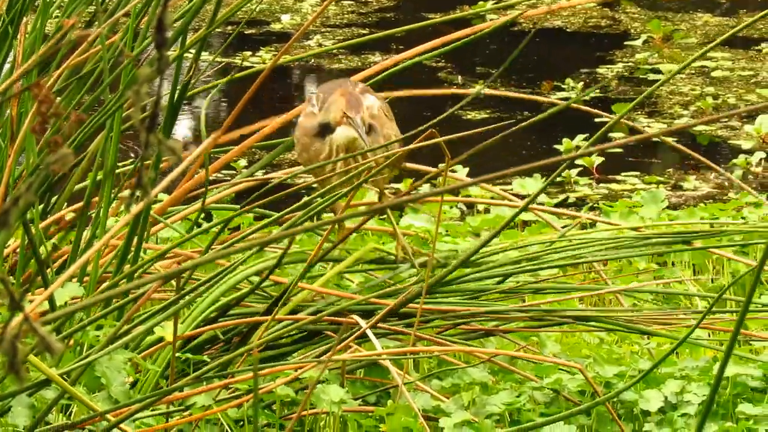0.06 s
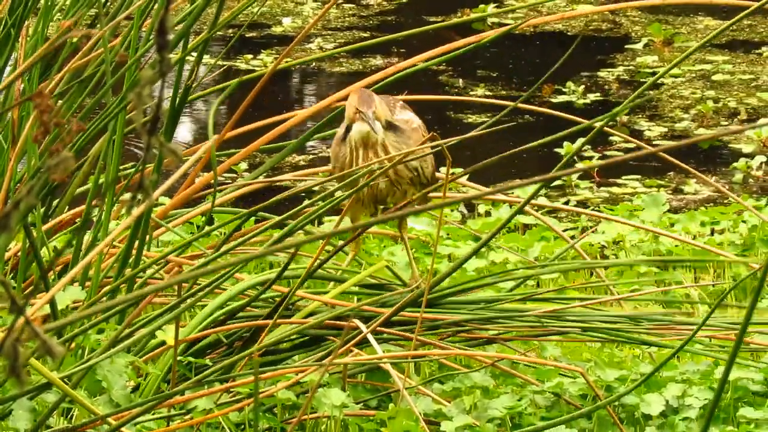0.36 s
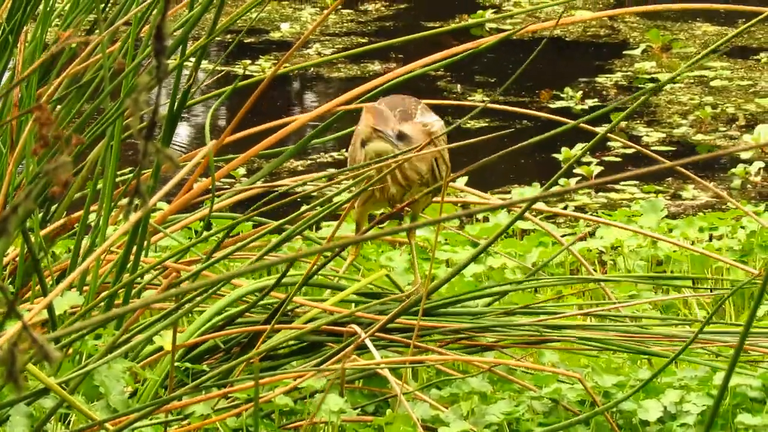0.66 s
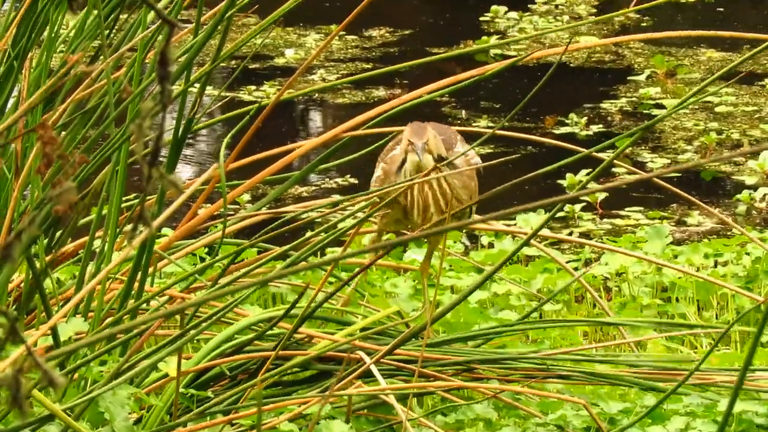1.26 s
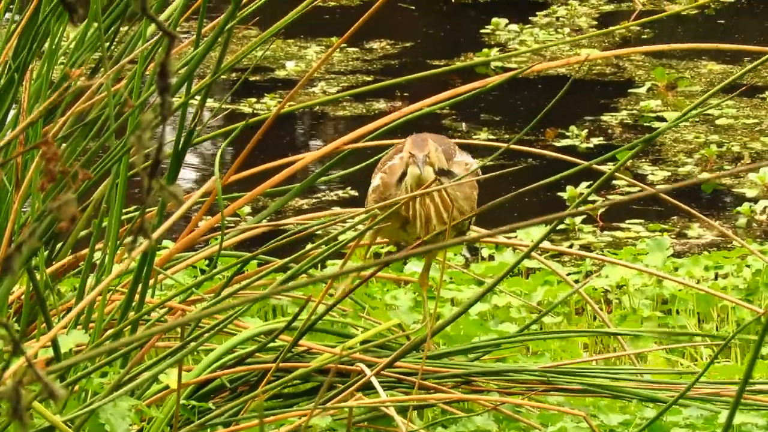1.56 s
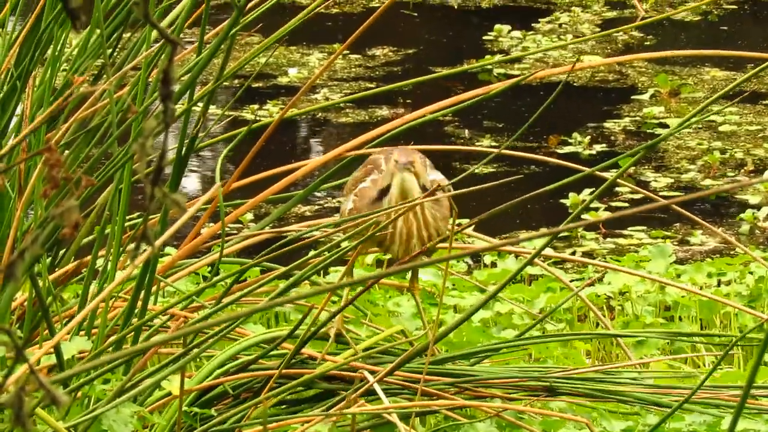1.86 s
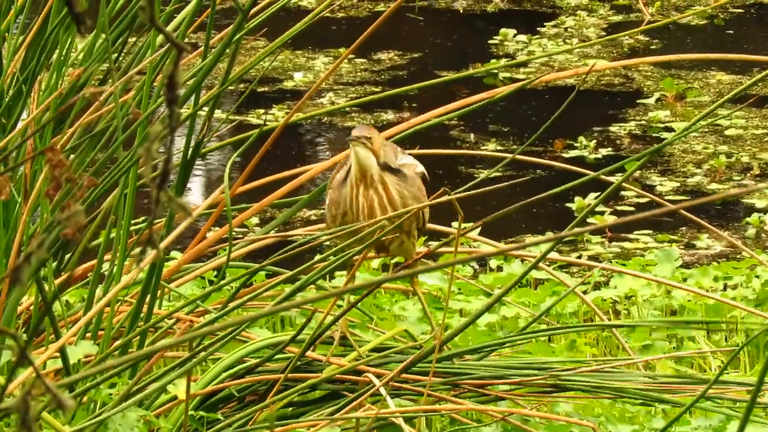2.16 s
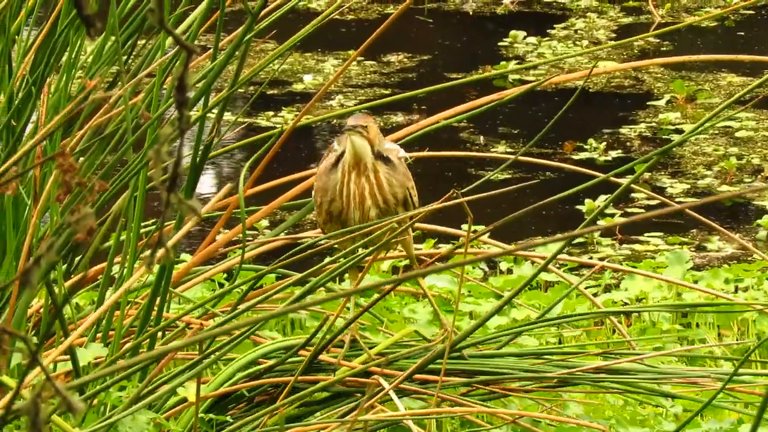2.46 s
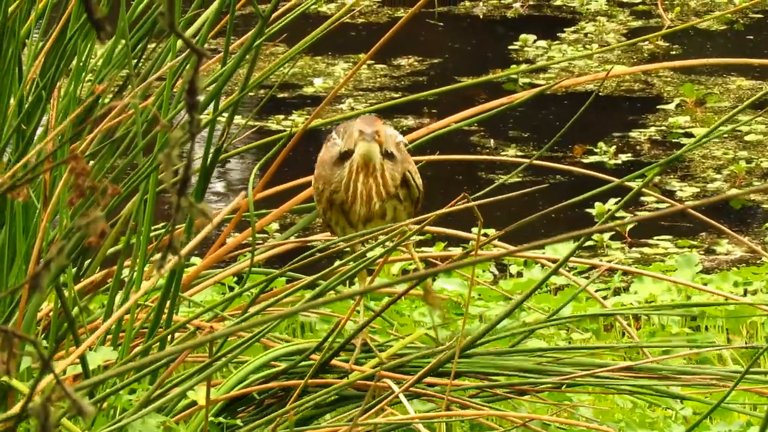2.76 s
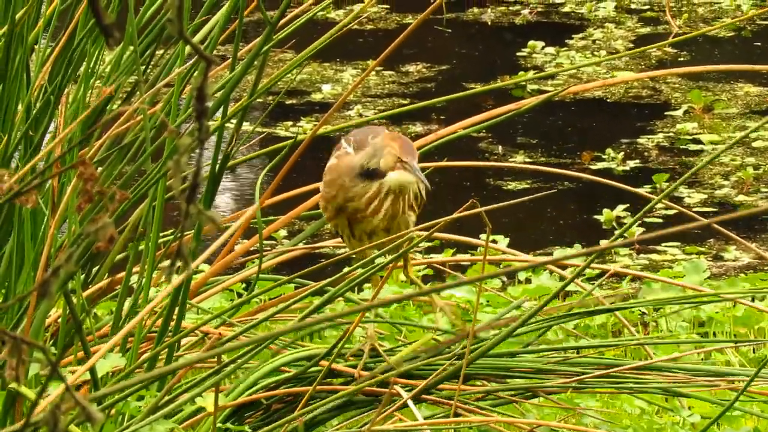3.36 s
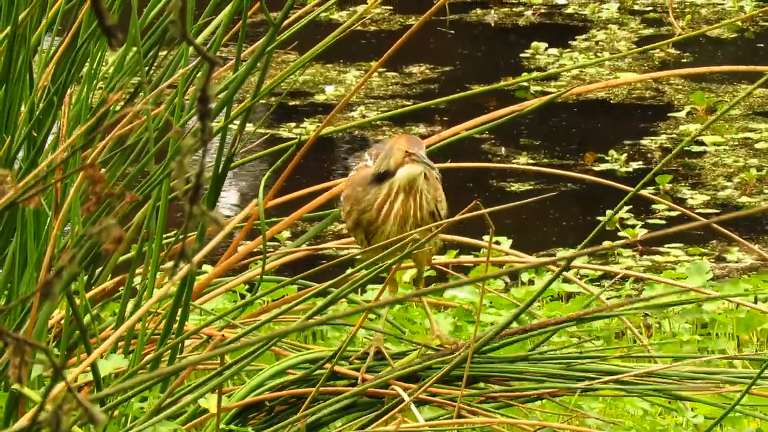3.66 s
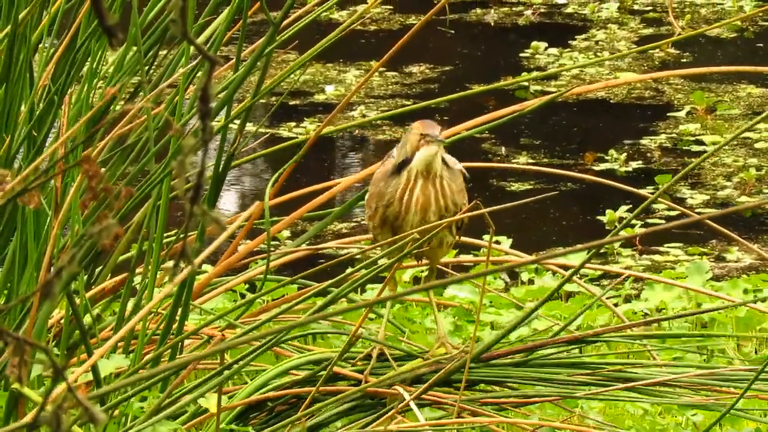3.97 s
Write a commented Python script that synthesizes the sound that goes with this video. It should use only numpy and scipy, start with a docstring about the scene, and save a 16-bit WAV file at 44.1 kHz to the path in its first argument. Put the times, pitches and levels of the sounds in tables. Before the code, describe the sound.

Wind thumps on the microphone in low pulses at the start, around 2 seconds and most strongly from 2.8 seconds on, over a steady distant rumble. Two faint hoarse squeaks come at 0.6 seconds. Distant birds pipe twice and slur a whistle between 0.9 and 1.5 seconds, then chirp thinly from 2.5. A water bird yelps softly four times after 3.1, and a bird rasps at the end.

```python
"""Breezy marsh with songbirds

Two microphone ports in the open by a pond. Eddies of wind thump right across them in low gulping
pulses, mostly left first. Off in the echoing trees, songbirds pipe, slur and rasp; a dry reed ticks,
something squeaks twice and a water bird yelps. Far behind lies a steady rumble like traffic."""
import sys
import numpy as np
from scipy import signal
from scipy.fft import rfft, irfft
from scipy.io import wavfile
from scipy.ndimage import uniform_filter1d

SR = 44100
rng = np.random.default_rng(int(sys.argv[2]) if len(sys.argv) > 2 else 0)


def store_pcm(level_fs):
    """Save levels as 16-bit WAV."""
    pcm = np.round(np.clip(level_fs, -1, 1) * 32767).astype(np.int16)
    wavfile.write(sys.argv[1], SR, np.atleast_2d(pcm).T)


N = 176400

# Levels in the tables are relative, ahead of the mix gains and the echo.
# far rumble and leaf hiss, spectrum of the mid channel: f/Hz, level/dB
RUMBLE_SPECTRUM = [(25, -19), (60, -2.5), (230, 3.5), (320, -6), (480, -6.5), (590, -8), (690, -6.5),
                   (745, -2), (790, -5.5), (850, -2), (885, -12), (935, -1), (1010, -10.5), (1062, -1.5),
                   (1125, -13), (1200, -12), (2000, -22.5), (3700, -25.5), (5200, -32.5), (8000, -39),
                   (14000, -48.5)]
# its stereo width, side relative to mid: f/Hz, level/dB
RUMBLE_WIDTH = [(200, -27), (400, -1.5), (900, -14), (1300, -4.5), (2300, -0.5), (4200, -2.5), (7700, 2),
                (14000, 0.5)]
# large eddies at the microphone: t/s, level/dB, centre f/Hz, lag of the right port/ms
LARGE_EDDIES = [(.006, -23, 128, 5), (0.051, -27, 119, 2), (.134, -25.5, 141, 2.5),
                (0.197, -20.5, 136, 3.5), (.282, -23.5, 178, 0.5), (.545, -30, 134, 0.75),
                (.862, -35, 130, 1.1), (1.352, -23.5, 163, 2), (1.741, -23, 100, 1.4),
                (1.853, -22.5, 112, 3.5), (1.914, -22.5, 118, 4), (2.039, -20, 145, 4),
                (2.098, -25.5, 134, 2.5), (2.139, -23.5, 143, 2.5), (2.196, -18, 143, 2.5),
                (2.310, -32, 178, -0.5), (2.806, -31, 125, 0.3), (2.850, -24.5, 177, 0.25),
                (2.864, -21.5, 248, 0.55), (3.029, -22.5, 225, .5), (3.065, -24, 212, 0.4),
                (3.180, -23.5, 166, 0.05), (3.199, -22.5, 260, 0.9), (3.206, -19.5, 310, 1.6),
                (3.229, -25.5, 128, 0.5), (3.314, -20, 221, 3), (3.328, -23, 138, -1.5),
                (3.386, -17.5, 188, 1.84), (3.522, -17, 176, 1.9), (3.544, -23.5, 172, 0.65),
                (3.698, -16, 197, 2.16), (3.730, -25, 173, 0.8), (3.758, -25.5, 157, 1.0)]
# strength of the breeze's small eddies: t/s, level/dB
BREEZE_LEVEL = [(0, -34.5), (.14, -33.5), (.24, -46.5), (.38, -56.5), (.46, -44.5), (.63, -42.5),
                (.76, -57), (.86, -45), (1.0, -62.5), (1.3, -59.5), (1.481, -47), (1.8, -43), (1.92, -36.5),
                (2.191, -32), (2.24, -53.5), (2.65, -73), (2.83, -35.5), (2.93, -48), (3.05, -36.5),
                (3.13, -45), (3.2, -34), (3.46, -39), (3.56, -33.5), (3.63, -42), (3.76, -35),
                (3.88, -41.5), (4, -53)]
# thin glides of distant birds: t/s, length/s, start f/Hz, end f/Hz, level/dB
FAR_NOTES = [(0.048, 0.03, 7350, 5800, -60), (2.453, .06, 6750, 6550, -66),
             (2.538, 0.06, 6900, 6500, -65.5), (2.645, 0.087, 4520, 4665, -63),
             (2.682, 0.052, 6150, 6230, -64), (2.737, 0.056, 4620, 4680, -56.5),
             (2.831, 0.028, 4750, 4640, -60), (2.946, 0.047, 6340, 5860, -60.5),
             (3.05, 0.072, 6160, 5780, -59.5), (3.183, 0.051, 5780, 5500, -66.5)]
# song so far off that only a haze arrives: t/s, length/s, centre f/Hz, width/Hz, level/dB
SONG_HAZES = [(.82, 0.46, 4520, 750, -71), (1.61, 0.16, 3700, 700, -66), (2.73, 0.14, 3900, 1100, -68.5)]
# reed tick: t/s, centre f/Hz, width/Hz, level/dB
REED_TICKS = [(0.109, 3320, 900, -49.5)]
# hoarse squeaks: t/s, length/s, start f/Hz, end f/Hz, tone level/dB, hiss level/dB
SQUEAK_NOTES = [(0.554, 0.0555, 1120, 1230, -60, -62.5), (0.624, .08, 1102, 1323, -61, -70)]
# their overtones: multiple of f, level/dB
SQUEAK_PARTIALS = [(2, -3), (3, -0.5), (4, -18)]
# piping notes in the trees: t/s, length/s, level/dB
PIPE_NOTES = [(0.891, 0.095, -48), (1.302, 0.15, -49)]
# one long slurred whistle: t/s, f/Hz, level/dB
SLUR_CONTOUR = [(1.268, 3290, -61), (1.288, 4110, -54), (1.32, 4405, -53), (1.355, 4416, -48.5),
                (1.41, 4260, -52.5), (1.445, 4175, -58), (1.482, 4330, -48), (1.497, 5000, -52),
                (1.514, 5900, -55), (1.535, 6240, -58), (1.555, 6170, -74.5)]
# water bird's yelps: t/s, length/s, start f/Hz, end f/Hz, level/dB
YELP_NOTES = [(3.136, 0.073, 1101, 790, -50.5), (3.263, .085, 690, 830, -53.5),
              (3.698, 0.052, 860, 735, -46.5), (3.923, 0.056, 1130, 680, -46.5)]
# note that opens the rasp: t/s, length/s, f/Hz, level/dB
RASP_FIRST_NOTE = (3.852, .055, 4030, -58.5)
# rasping call: t/s, centre f/Hz, level/dB
RASP_CONTOUR = [(3.867, 5700, -70), (3.9, 5450, -57.5), (3.916, 4140, -52.5), (3.955, 3854, -50),
                (4.0, 3720, -48.5)]

EDGE_S, NOTE_SWELL_S = .022, .028  # rise and fall of a note: usual, softer
REEDS_T60_S, CALL_T60_S = .31, 1.5  # scatter from near reeds, echo of the short calls


def undb(db):
    return 10 ** (np.asarray(db) / 20)


def unit(x):
    return x / np.sqrt(np.mean(x ** 2))


def clock():
    return np.arange(N) / SR


def walk(rate):
    """Smooth random wander with spread near 1, about `rate` turns a second."""
    hold = max(int(SR / rate), 1)
    steps = rng.standard_normal(N)[np.arange(N) // hold]
    return 1.3 * uniform_filter1d(uniform_filter1d(steps, hold), hold)


def per_bin(points):
    """Gain at every frequency from rows of f/Hz, level/dB."""
    hz, db = np.array(points).T
    f = np.arange(N // 2 + 1) * SR / N
    return undb(np.interp(np.log(f + 1e-3), np.log(hz), db))


def noise(gain):
    return irfft(rfft(rng.standard_normal(N)) * gain, N)


def band(hz, width):
    """Noise of rms 1 in one band."""
    f = np.arange(N // 2 + 1) * SR / N
    return unit(noise(1 / (1 + (2 * (f - hz) / width) ** 4)))


def tone(hz):
    """Sine of rms 1 on a moving pitch."""
    return np.sqrt(2) * np.sin(2 * np.pi * np.cumsum(hz) / SR)


def contour(rows):
    """Pitch and gain of a call from rows of t/s, f/Hz, level/dB."""
    s, hz, db = np.array(rows).T
    return np.interp(clock(), s, hz), undb(np.interp(clock(), s, db, left=-np.inf, right=-np.inf))


def glide(start, length, hz0, hz1, db, edge_s=EDGE_S):
    """Pitch and gain of a note that swells, glides and fades."""
    t = clock() - start
    edge = np.clip(np.minimum(t, length - t) / min(edge_s, length / 2), 0, 1)
    return np.interp(t, [0, length], [hz0, hz1]), undb(db) * edge


def trees(call, wet, t60=CALL_T60_S, near=1):
    """A call at the microphone: direct sound, quick scatter off near reeds, a long fluttering echo."""
    t = clock()[:N // 2]
    decay = near * unit(undb(-60 * t / REEDS_T60_S)) + .88 * unit(undb(-60 * t / t60))
    paths = rng.standard_normal((2, 2, len(t))) * unit(decay) / np.sqrt(len(t))
    one, other = signal.fftconvolve(call[None, None], paths, axes=2)[..., :N]
    sway = 1.3 * walk(30)  # radians; drifting between two echoes makes the flutter
    mid, side = np.cos(sway) * one + np.sin(sway) * other
    width = .42
    echo = np.array([mid + width * side, mid - width * side])
    return (call + wet * echo) / np.hypot(1, wet)


def rumble(level_db=-47, waver_db=1.0):
    """Far traffic near the centre, with a wide, faint leaf hiss above it."""
    colour = per_bin(RUMBLE_SPECTRUM)
    mid, side = noise(colour), noise(colour * per_bin(RUMBLE_WIDTH))
    low = signal.sosfilt(signal.butter(2, 1500, fs=SR, output="sos"), mid)
    waver = low * (undb(waver_db * walk(8.29)) - 1)
    return undb(level_db) * np.array([mid + waver + side, mid + waver - side]) / np.std(mid)


def add_eddy(ports, s, gain, hz, lag_ms):
    """A pressure dip between two shoulders reaches the ports in turn, a little changed on the way."""
    span = np.arange(max(int(s * SR) - 1200, 0), min(int(s * SR) + 1200, N))
    for port, sign in enumerate((-1, 1)):
        delay_s = sign * lag_ms / 2000  # half the lag each way
        port_hz = hz * np.exp(.1 * rng.standard_normal())
        spread = (np.pi * port_hz * (span / SR - s - delay_s)) ** 2
        ports[port, span] += gain * (2 * spread - 1) * np.exp(-spread)


def wind(small_per_s=160, port_top_hz=462, left_minus_right_db=-1.5):
    """Wind on the microphone: large eddies amid small ones that follow their size and direction."""
    large, small = np.zeros((2, 2, N))
    for s, db, hz, lag_ms in LARGE_EDDIES:
        add_eddy(large, s, undb(db + 1.25), hz, lag_ms)
    times, _, centres, lags = np.array(LARGE_EDDIES).T
    usual_hz = uniform_filter1d(centres, size=5)
    count = int(small_per_s * N / SR)
    for k, (when, loud, pitch, way) in enumerate(rng.standard_normal((count, 4))):
        s = np.clip((k + when) / small_per_s, 0, N / SR)
        hz = np.interp(s, times, usual_hz) * .84 * 2 ** (.38 * np.clip(pitch, -2, 2))
        lag_ms = np.interp(s, times, lags) + .46 * way
        add_eddy(small, s, undb(2 * np.clip(loud, -2, 2)), hz, lag_ms)
    breeze = undb(np.interp(clock(), *np.array(BREEZE_LEVEL).T) + 1.5)
    pressure = large + unit(small) * breeze
    f = np.arange(N + 1) * SR / (2 * N)
    port_lowpass = 1 / np.hypot(1, (f / port_top_hz) ** 6)
    pan = undb(np.array([[1], [-1]]) * left_minus_right_db / 2)
    return irfft(rfft(pressure, 2 * N) * port_lowpass)[:, :N] * pan


def whistles(rows, edge_s):
    """Gliding sine notes with a slight waver in pitch."""
    waver = 1 + .008 * walk(400)
    return sum(gain * tone(hz * waver) for hz, gain in (glide(*row, edge_s) for row in rows))


def far_birds():
    """Thin distant notes and a haze of song from farther off, more echo than direct sound."""
    notes = whistles(FAR_NOTES, NOTE_SWELL_S)
    haze = sum(glide(s, length, hz, hz, db)[1] * band(hz, width)
               for s, length, hz, width, db in SONG_HAZES)
    return trees(notes + haze, wet=1.34)


def reed(decay_s=.0039):
    """A dry stem ticks once: a burst of noise, dead centre, with no echo."""
    t = clock()
    return sum(undb(db) * band(hz, width) * (t > s) * np.exp(-np.abs(t - s) / decay_s)
               for s, hz, width, db in REED_TICKS)


def squeaks():
    """Two hoarse squeaks, mostly direct sound: rough harmonics in a scratchy hiss."""
    rough = 1 + .035 * walk(700)
    hiss = band(hz=3900, width=5300)
    calls = 0
    for s, length, hz0, hz1, tone_db, hiss_db in SQUEAK_NOTES:
        hz, gain = glide(s, length, hz0, hz1, 0)
        voice = sum(undb(db) * tone(k * hz * rough) for k, db in SQUEAK_PARTIALS)
        calls = calls + gain * (undb(tone_db) * voice + undb(hiss_db) * hiss)
    return trees(calls, wet=.35)


def piper(hz=3091):
    """A bird pipes two pure notes on one pitch that ring on among the trees."""
    gain = sum(glide(s, length, hz, hz, db, NOTE_SWELL_S)[1] for s, length, db in PIPE_NOTES)
    waver = 1 + .003 * walk(79.66)
    return trees(gain * tone(hz * waver), wet=.56, t60=2.2, near=.25)


def slur(flick_s=1.487, t60=.96):
    """A whistle rises and quivers; its hoarse upward flick reaches the microphone mostly as echo."""
    hz, gain = contour(SLUR_CONTOUR)
    flick = np.clip((clock() - flick_s) / EDGE_S + .5, 0, 1)
    quiver = .0072 * walk(250)
    hoarseness = flick * .021 * walk(900)
    song = gain * tone(hz * (1 + quiver + hoarseness))
    return trees(song * (1 - flick), wet=.69, t60=t60) + trees(song * flick, wet=1.7, t60=t60)


def water_bird():
    """Soft, low gliding yelps that echo round the pond."""
    return trees(whistles(YELP_NOTES, EDGE_S), wet=.58)


def rasp(shake_hz=232.7, swing_hz=600):
    """A rough note, then a falling whistle shaken into a hissing buzz by a second, uneven vibration."""
    hz, gain = contour(RASP_CONTOUR)
    shake = tone(shake_hz * (1 + .2 * walk(300))) / np.sqrt(2)
    buzz = tone(hz * (1 + .06 * walk(1500)) + swing_hz * shake)
    hiss = undb(-9.5) * band(hz=4560, width=2600) * (1 + shake)
    s, length, first_hz, db = RASP_FIRST_NOTE
    _, swell = glide(s, length, first_hz, first_hz, db)
    opening = swell * tone(first_hz * (1 + .027 * walk(700)))
    flicker = undb(1.8 * walk(250))
    return trees((gain * (buzz + hiss) + opening) * flicker, wet=1, t60=1.2)


def scene():
    """The marsh from the microphone's position, in stereo."""
    return (rumble() + wind() + far_birds() + reed() + squeaks()
            + piper() + slur() + water_bird() + rasp())


def record(dry, bass_hz=35, top_hz=14200):
    """The recorder trims the deepest bass and cuts the top. The sound fades in and out over 3 ms at its very
    ends."""
    f = np.arange(N + 1) * SR / (2 * N)
    trimmed = irfft(rfft(dry, 2 * N) * f ** 2 / np.hypot(f ** 2, bass_hz ** 2))[:, :N]
    fade = np.clip(np.minimum(clock(), clock()[::-1]) / .003, 0, 1)
    return signal.sosfilt(signal.ellip(8, .2, 70, top_hz, fs=SR, output="sos"), trimmed * fade)


dry = scene()
out = record(dry)
store_pcm(out)
```